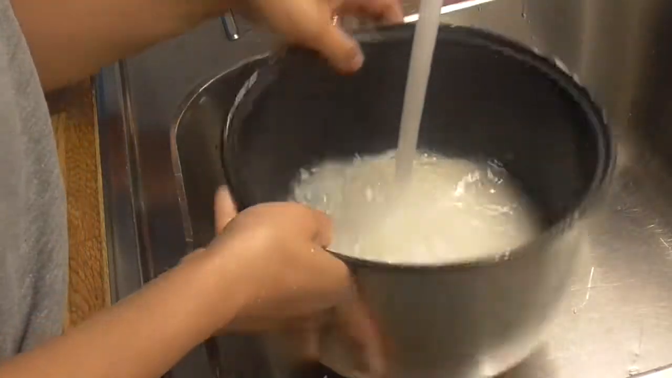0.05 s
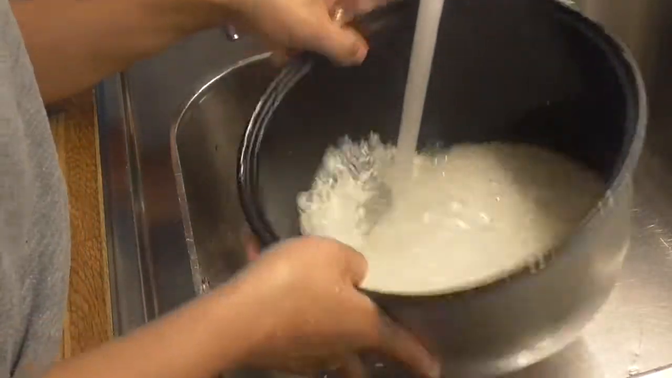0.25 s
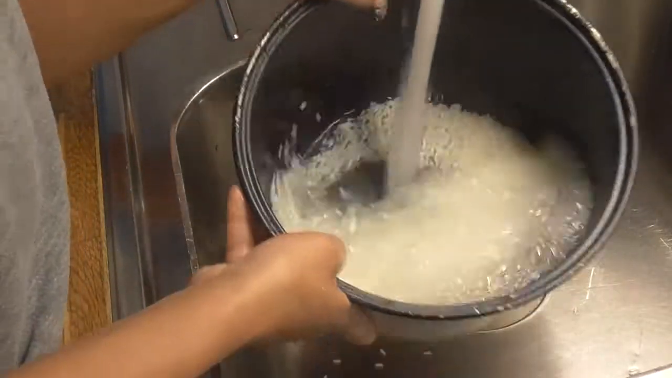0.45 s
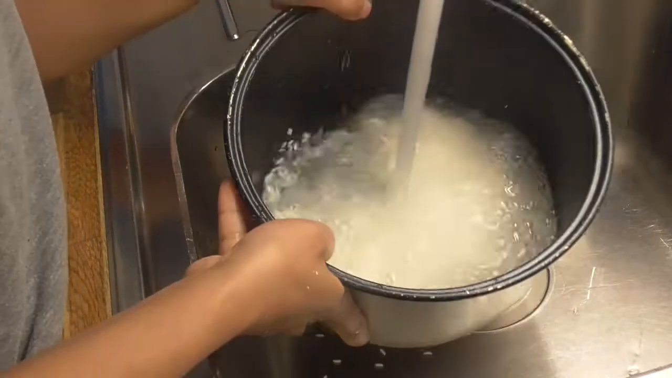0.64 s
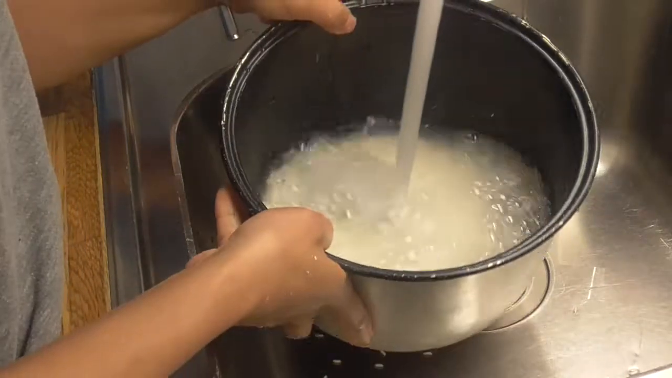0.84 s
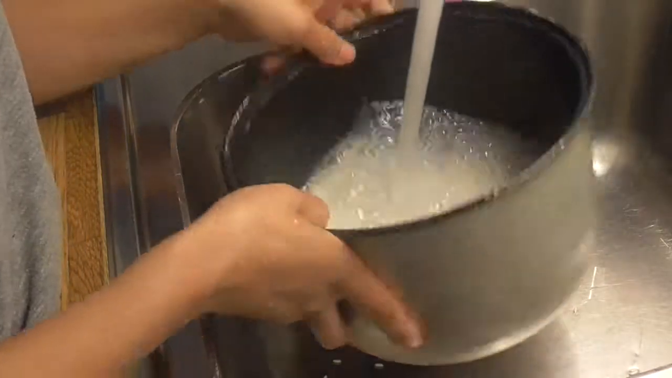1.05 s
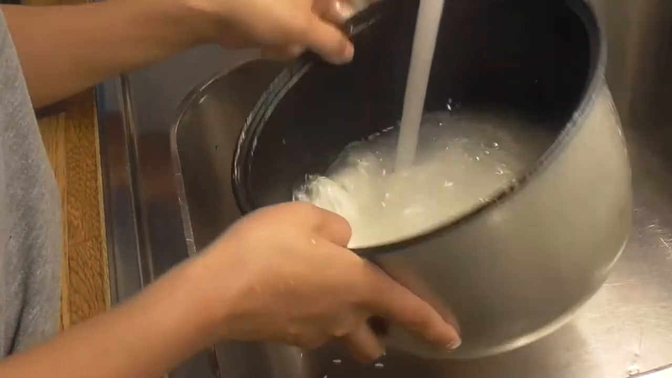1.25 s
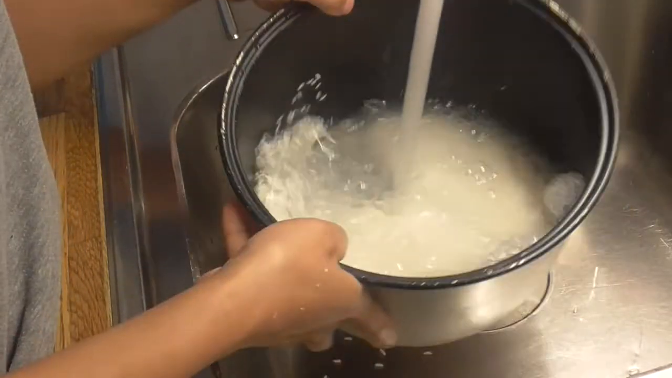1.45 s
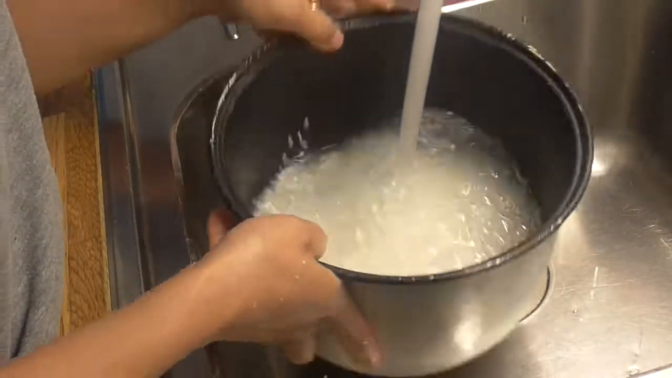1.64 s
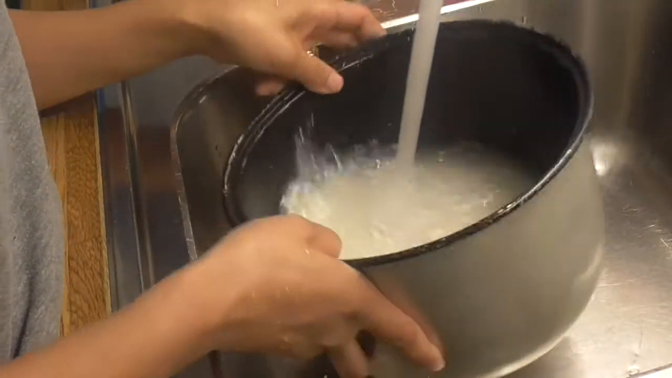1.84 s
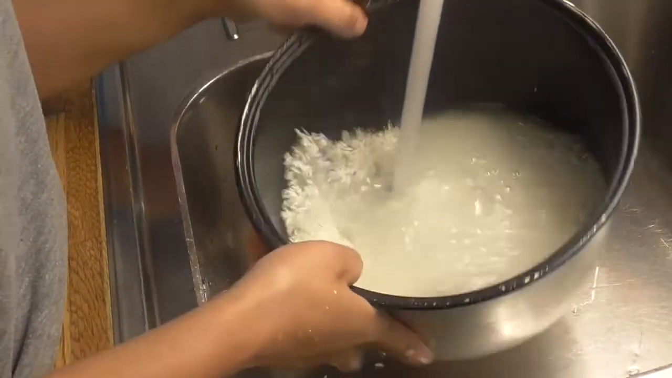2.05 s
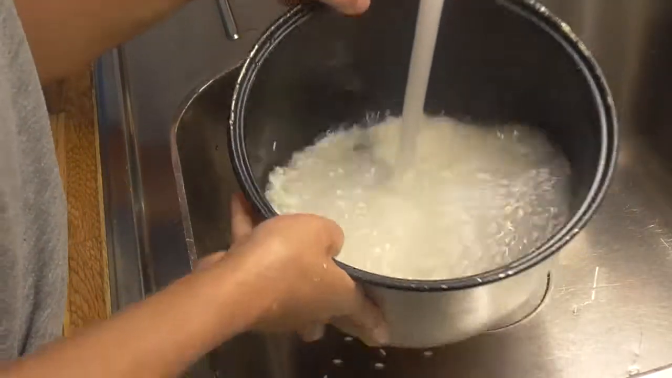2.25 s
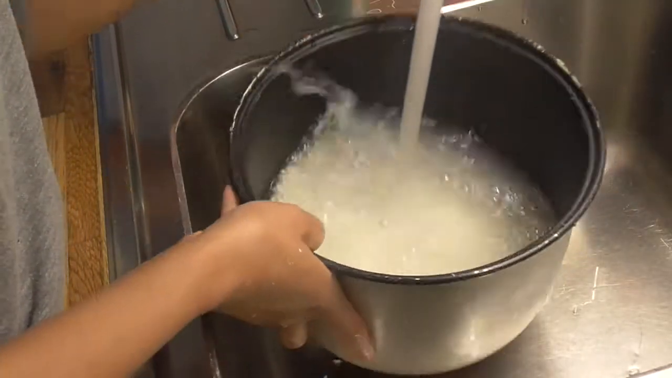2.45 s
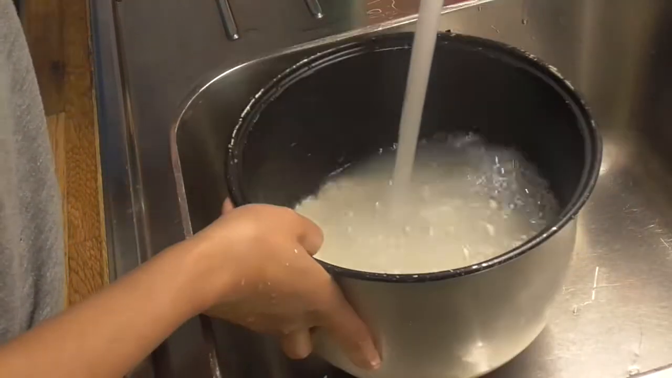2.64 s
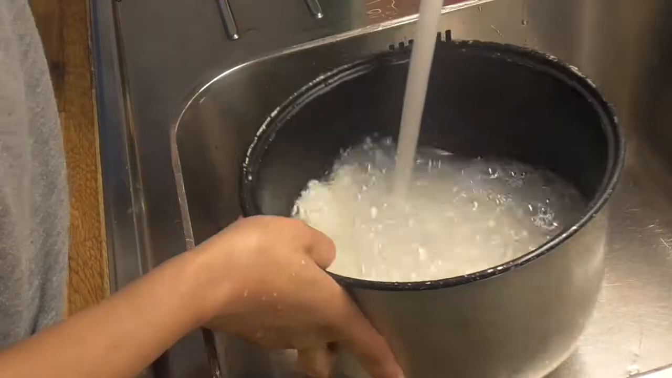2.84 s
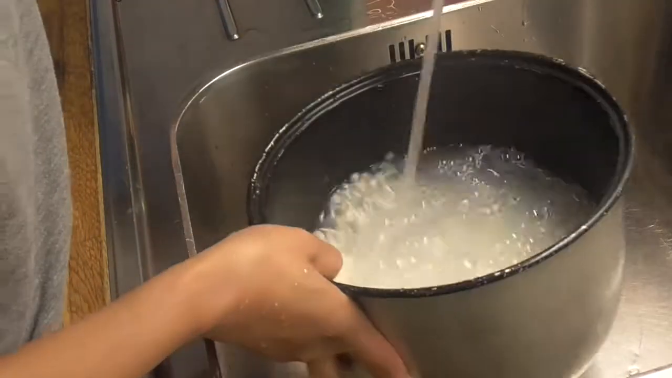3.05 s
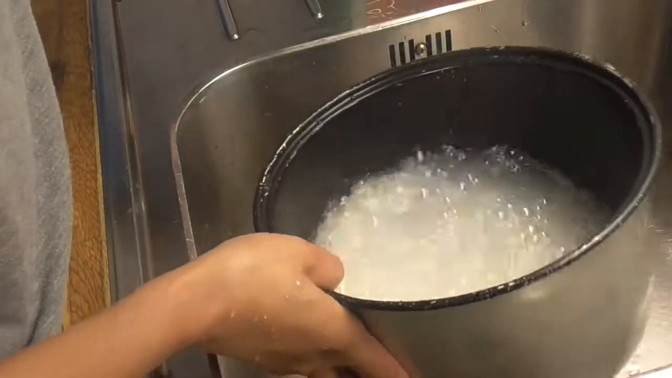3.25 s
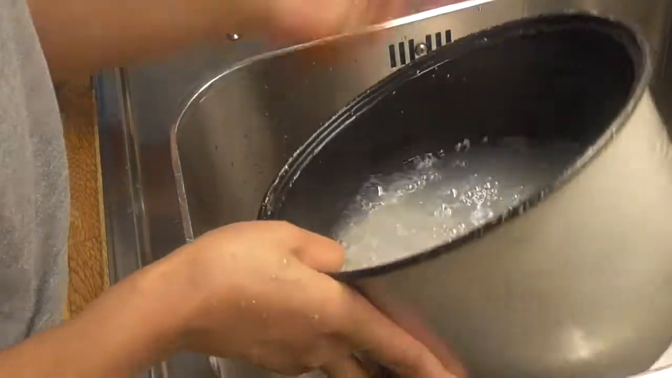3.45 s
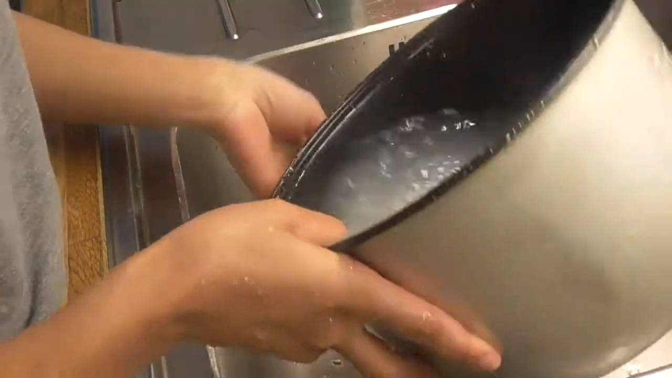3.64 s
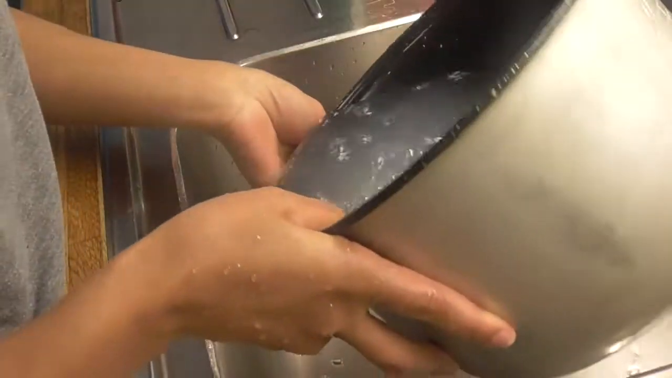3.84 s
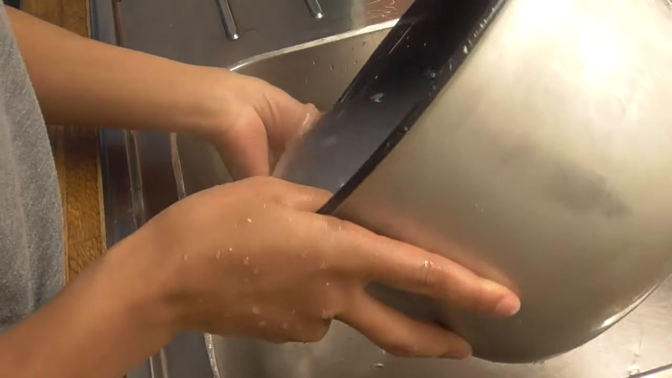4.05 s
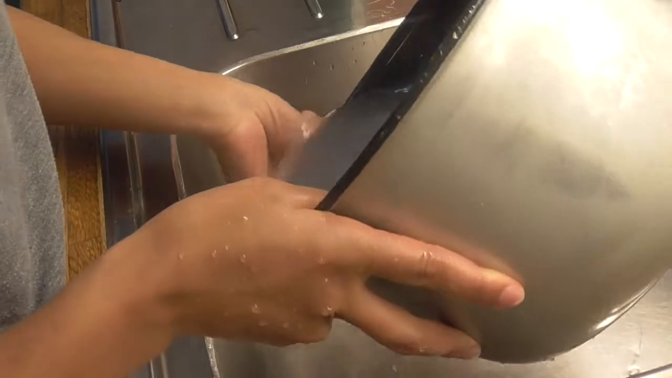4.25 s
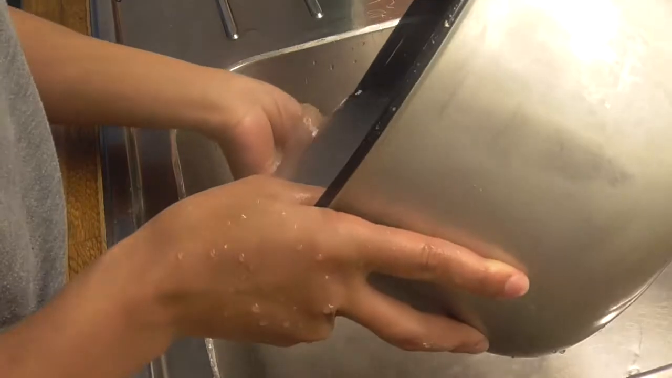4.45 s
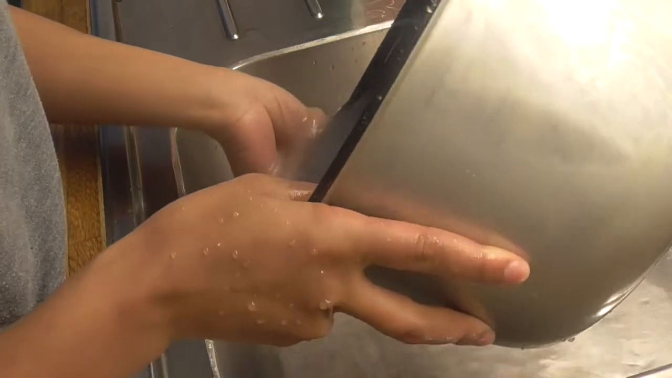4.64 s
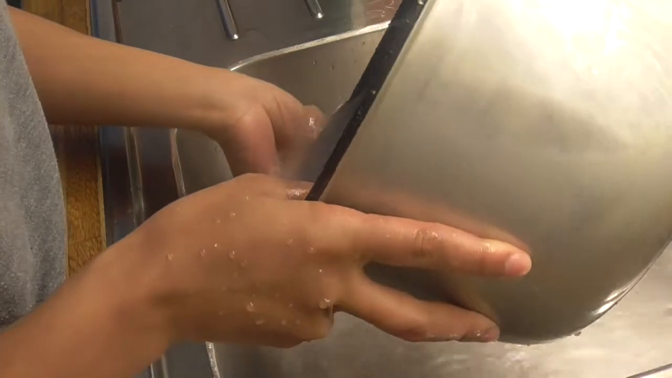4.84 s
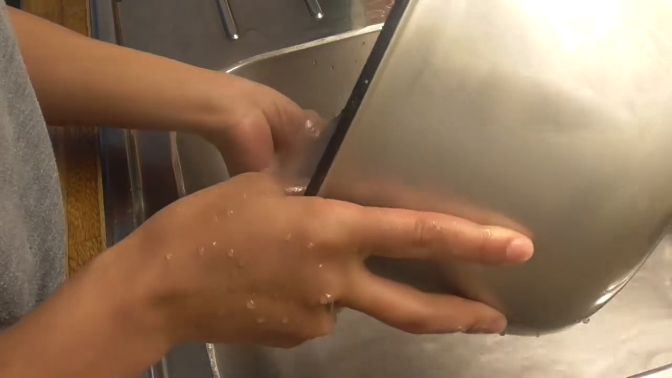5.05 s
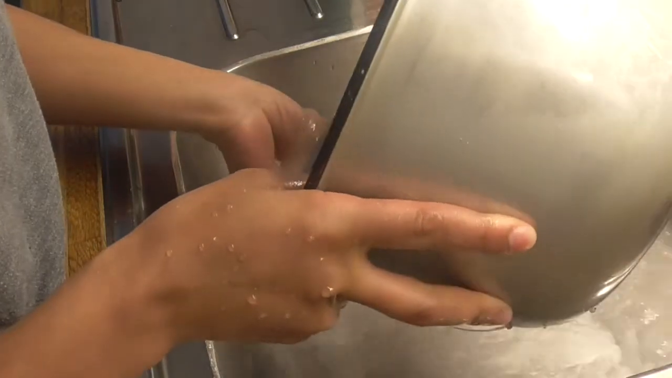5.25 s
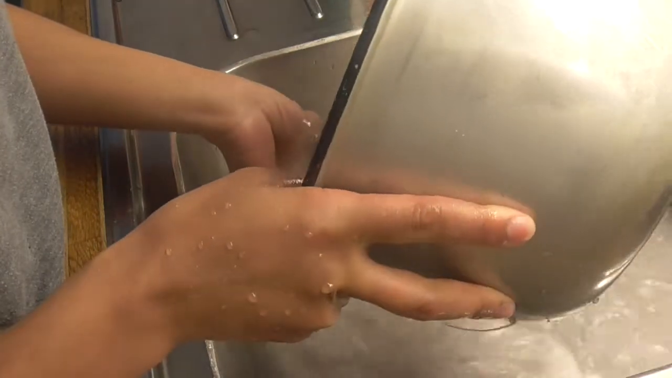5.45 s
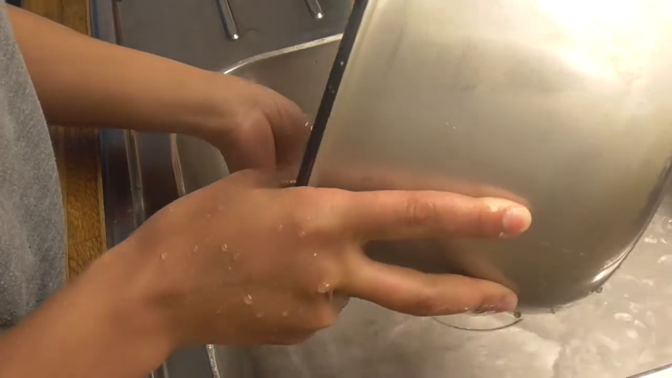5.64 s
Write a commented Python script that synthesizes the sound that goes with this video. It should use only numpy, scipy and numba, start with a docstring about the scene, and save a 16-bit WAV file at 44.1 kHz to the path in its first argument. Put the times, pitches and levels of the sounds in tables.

```python
"""Tap water runs into a metal pot of rice swirled over a steel sink: noise and clouds of decaying sines make
the jet's fizz and splash, and bubbles gurgle through the pot's air resonances. As the tap shuts, froth fizzes
and drops ping. The tilted pot knocks against the sink with ringing modes, soft thuds and scraping noise.
Then water spills over the rim, first in drops, then as a stream that patters in bubble clouds and drums on
the steel as resonated noise. A soft steady hiss lies under it all."""
import sys
import numpy as np
from scipy import signal
from scipy.fft import rfft, irfft
from scipy.io import wavfile
from numba import njit

SR = 44100
rng = np.random.default_rng(int(sys.argv[2]) if len(sys.argv) > 2 else 0)


def transcribe(signal):
    """Save signal, clipped to [-1, 1], as a 16-bit WAV file at the path in sys.argv[1]."""
    frames = np.atleast_2d(signal).T
    limited = np.clip(frames, -1, 1)
    pcm = np.round(limited * 32767).astype(np.int16)
    wavfile.write(sys.argv[1], SR, pcm)


N = 251370
TIME = np.arange(N) / SR  # t/s of every sample


# Colour of the jet's fine spray: f/Hz, level/dB (per Hz)
SPRAY_COLOUR = [(3820, -61), (6500, -11), (9370, -4), (11300, -4), (14900, -10.5), (15900, -19)]
# Colour of the jet's splashing: f/Hz, level/dB (per Hz)
SPLASH_COLOUR = [(600, -14), (900, 3), (1400, 2), (1770, -4), (2240, -5), (2650, -7), (3150, -3),
                 (3750, 0.5), (4600, -1.5), (5900, -2), (7000, -8), (9100, -28)]
# Colour of the air bubbles driven under the surface: f/Hz, level/dB (per Hz)
GURGLE_COLOUR = [(40, -47), (90, -11), (150, -18.5), (210, -9), (330, -7), (400, -2.5), (510, -2.5),
                 (690, -3.5), (780, -16), (900, -13), (1050, -11), (1450, -22.5), (1750, -38), (2600, -28)]
# Air resonances of the pot: f/Hz, width/Hz, level/dB
POT_AIR_MODES = [(259.3, 15.6, 12.5), (514.5, 27, 1.5), (571.8, 7.4, 5.5), (705, 23, 3), (869, 16, 8)]
POT_DRIFT = 0.025  # share by which moving water shifts the pot's resonances


def tap():
    """The jet sprays and splashes; the air it drags under gurgles in the hollow of the pot."""
    spray_gain, splash_gain, gurgle_gain = jet_gains()
    flutter = walk(70)  # the jet breaks up unevenly
    slosh = walk(21.9)  # the surface rocks
    spray = fizz(SPRAY_COLOUR, rate=7000, low_hz=6000, high_hz=16000, cycles=14, spread_db=2.6, hiss_db=2.5)
    splash = fizz(SPLASH_COLOUR, rate=4500, low_hz=800, high_hz=7500, cycles=22, spread_db=1.8, hiss_db=4)
    drift = POT_DRIFT * walk(11)
    gurgles = []
    for _ in range(2):
        cloud = bubbles(rate=1100, low_hz=150, high_hz=1900, cycles=32, spread_db=1.35, glide=0.1)
        churn = colour(cloud + 0.5 * rng.standard_normal(N), GURGLE_COLOUR)
        hollow = unit(churn + resonate(churn, POT_AIR_MODES))
        gurgles.append(waver(hollow, drift))
    hiss = spray_gain * spray + splash_gain * splash
    jet = hiss * undb(0.89 * flutter + 0.58 * slosh)
    return jet + gurgle_gain * stereo(*gurgles) * undb(0.34 * flutter + 0.18 * slosh)


# Waves of deeper water that each swirl sends under the jet: t/s of the crest, half length/s, rise/dB
SWIRL_WAVES = [(.29, 0.094, 6), (.73, 0.057, 5), (1.24, 0.19, 5.5), (1.46, 0.067, 7.5), (1.68, 0.061, 2),
               (1.89, 0.068, 3.5), (2.06, 0.22, 5.5), (2.47, 0.078, 6), (2.81, 0.22, 6), (3.14, 0.12, 7)]
# The rocking pot shields or bares the fine spray: t/s of the crest, half length/s, rise/dB
POT_TILTS = [(.85, 0.56, -1), (1.58, .14, 1), (2.25, 0.11, 1.3)]
SPRAY_DB, SPLASH_DB, GURGLE_DB = -25.5, -32, -33  # open tap, before flow, waves and flutter
SHUT_S, SHUT_EASE_S = 3.153, 0.074  # the tap is half shut
GURGLE_LAG_S, GURGLE_EASE_S = 0.15, 0.045  # air already dragged under gurgles on
SPLASH_POWER = 0.64  # power of the flow below 1, so the splashing outlasts the spray
WAVE_SPLASH = 0.021  # share of a wave's rise in dB that the splashing follows
BARE_S, THINNING_S, THINNING_DB = 0.436, 0.074, 5  # one swing bares the bottom of the pot
COVER_S, BARE_DIP_DB = 0.075, -9  # the hiss is lowest COVER_S after that, until the water is back
SLAP_DB, SLAP_T60_S = -21, 0.049  # burst of splashing as the bottom is bared


def jet_gains():
    """Spray, splashing and gurgling follow the tap's flow and the depth of the water under the jet."""
    flow = closing(SHUT_S, SHUT_EASE_S)
    waves_db = swells(SWIRL_WAVES)
    since = TIME - BARE_S
    thinning_db = THINNING_DB * np.exp(-np.abs(since) / THINNING_S) * (since < 0)
    covering = np.maximum(since, 0) / COVER_S
    dip_db = BARE_DIP_DB * covering * np.exp((1 - covering ** 2) / 2)
    depth_db = thinning_db + dip_db
    spray = flow * undb(SPRAY_DB + depth_db + swells(POT_TILTS))
    splash = flow ** SPLASH_POWER * undb(SPLASH_DB + depth_db + WAVE_SPLASH * waves_db)
    slap = undb(SLAP_DB) * fade(BARE_S, SLAP_T60_S)
    gurgle = closing(SHUT_S + GURGLE_LAG_S, GURGLE_EASE_S) * undb(GURGLE_DB + waves_db)
    return spray, splash + slap, gurgle


# Colour of the poured spray: f/Hz, level/dB (per Hz)
POUR_SPRAY_COLOUR = [(3530, -37), (6000, -13), (8050, -7.5), (8850, -7), (11900, -6), (13800, -10),
                     (15500, -26)]
# Colour of the patter on steel: f/Hz, level/dB (per Hz)
PATTER_COLOUR = [(600, -32), (1300, -0.5), (1800, -9), (2200, 5), (2700, -2), (4000, 4.5), (6000, -0.5),
                 (7500, -37), (10000, -62)]
# Colour of the puddle in the sink: f/Hz, level/dB (per Hz)
PUDDLE_COLOUR = [(250, -4.5), (500, -18), (650, 3), (820, -7.5), (1100, -3.5), (1450, -6.5), (1900, -5.5),
                 (2600, -31)]
# Water running over the rim as the pot is tipped: t/s, share of the full flow
POUR_FLOW_CURVE = [(4.14, 0.025), (4.21, 0.043), (4.29, 0.03), (4.39, 0.42), (4.455, 0.27), (4.52, 0.57),
                   (4.63, 0.61), (4.79, 0.89), (5.45, 0.98), (5.7, 0.81)]
# Growth of spray, patter, puddle and drumming, one row each: level/dB at full flow, power of the flow
POUR_GROWTH = [(-28.5, 0.52), (-33, 1.04), (-37.5, 2), (-37.5, 0.2)]
# Heavy gouts plunging into the puddle: t/s of the crest, half length/s, rise/dB
GOUT_PLUNGES = [(4.81, 0.025, 2), (4.94, 0.03, 8.5), (5.4, 0.046, 1)]
TINKLE_DB = 1.5  # ringing bubbles against the patter
DRIBBLE_DB = -11  # drumming of the dribble against that of the stream
DRUM_START_S, DRUM_EASE_S = 4.285, 0.012  # the dribble joins into a stream and starts to drum
CUSHION_S, CUSHION_EASE_S, CUSHION_DB = 5.5, 0.04, -2.5  # the deepening puddle softens the drumming


def pour():
    """The sheet of water tears into gouts that spatter, tinkle, gurgle in the puddle and shake the sink."""
    flow = np.interp(TIME, *np.transpose(POUR_FLOW_CURVE), left=0)
    spray_gain, patter_gain, puddle_gain, drum_gain = (undb(db) * flow ** power for db, power in POUR_GROWTH)
    gouts = undb(0.81 * walk(90) + 1.14 * walk(24))
    spray = fizz(POUR_SPRAY_COLOUR, rate=2200, low_hz=5500, high_hz=15000, cycles=28, spread_db=2.7, hiss_db=0)
    patter = fizz(PATTER_COLOUR, rate=3200, low_hz=1200, high_hz=7000, cycles=30, spread_db=2, hiss_db=3)
    # longer-lived bubbles ring here and there across the sink
    mid, side = (
        unit(colour(bubbles(rate=210, low_hz=1200, high_hz=7000, cycles=190, spread_db=1.6, glide=0.04),
                    PATTER_COLOUR))
        for _ in range(2))
    tinkle = (mid + side * np.array([[0.5], [-0.5]])) / 2
    puddle = fizz(PUDDLE_COLOUR, rate=520, low_hz=480, high_hz=2300, cycles=55, spread_db=1.5, hiss_db=-4)
    stream = 1 - (1 - undb(DRIBBLE_DB)) * closing(DRUM_START_S, DRUM_EASE_S)
    cushion = undb(CUSHION_DB * (1 - closing(CUSHION_S, CUSHION_EASE_S)))
    spatter = spray_gain * spray + patter_gain * (patter + undb(TINKLE_DB) * tinkle)
    plunging = puddle_gain * undb(swells(GOUT_PLUNGES)) * puddle
    return gouts * spatter + plunging + drum_gain * stream * cushion * drumming()


# Resonances of the sink's floor under the stream: f/Hz, width/Hz, level/dB
SINK_MODES = [(75, 25, -17), (117, 44, -3), (209, 7.3, 10.5), (239.7, 8.9, 11.5), (266, 9.6, 14.5),
              (345, 30, 5.5), (403, 26, 1.5), (660, 110, -4.5)]
# Modes that ring only while that floor is still bare: f/Hz, width/Hz, level/dB
BARE_SINK_MODES = [(232, 13, 1.5), (339, 19, -0.5), (392, 17, -9), (696, 42, -7.5)]
BARE_SINK_DB, SINK_COVERED_S, SINK_COVER_EASE_S = -2.5, 4.8, 0.03
DRUM_DRIFT = 0.035  # share by which moving water shifts the sink's resonances


def drumming():
    """Noise blows ring the sink's floor; water on it makes the pitch wander and damps the bare modes."""
    bare = closing(SINK_COVERED_S, SINK_COVER_EASE_S)
    drift = DRUM_DRIFT * walk(9)
    drums = []
    for _ in range(2):
        blows = colour(rng.standard_normal(N), [(30, -43), (80, 7.0), (650, 2.5), (1500, -21)])
        wet_floor = waver(unit(resonate(blows, SINK_MODES)), drift)
        bare_floor = unit(resonate(blows, BARE_SINK_MODES))
        drums.append(wet_floor + undb(BARE_SINK_DB) * bare * bare_floor)
    return stereo(*drums)


# Large single bubbles: t/s, level/dB, f/Hz
PLOP_BUBBLES = [(.285, -16, 460), (.319, -15, 458), (.343, -10.5, 528), (0.436, -11.5, 1164),
                (.653, -18, 506), (.693, -16, 516), (.725, -20, 946), (1.18, -21, 703), (1.209, -16, 670),
                (1.322, -11, 517), (1.407, -12, 272), (1.446, -12, 456), (1.482, -9.5, 408),
                (1.487, -16.5, 660), (1.494, -19.5, 960), (1.713, -12.5, 512), (1.785, -20, 920),
                (1.815, -13.5, 575), (1.869, -7, 535), (1.875, -10.5, 251), (1.929, -14.5, 487),
                (1.962, -14, 260), (1.972, -11, 498), (2.052, -14, 665), (2.055, -11, 413),
                (2.079, -14, 256), (2.122, -11.5, 510), (2.225, -15, 404), (2.392, -15.5, 1004),
                (2.408, -13.5, 562), (2.65, -16, 557), (2.714, -21, 554), (2.718, -20, 226),
                (2.776, -12, 594), (2.785, -11, 990), (2.816, -14.5, 946), (2.823, -14, 267),
                (3.033, -15, 690), (3.166, -8.5, 474), (3.172, -11, 257), (3.262, -22.5, 1040),
                (3.33, -22.5, 967), (3.332, -25, 1295), (3.355, -30, 900), (4.342, -29, 3780),
                (4.601, -23, 4150), (4.66, -28, 1940), (4.746, -26, 2000), (4.806, -21, 1350),
                (4.915, -17.5, 1090), (4.925, -24, 645), (4.944, -17, 1106), (4.986, -21.5, 1070),
                (5.045, -23, 1300), (5.183, -25, 2800), (5.369, -20.5, 605), (5.371, -23, 403)]
PLOP_CYCLES, PLOP_CYCLES_POWER = 54, 0.84  # cycles of ringing at 1 kHz; smaller bubbles ring for more cycles
PLOP_GLIDE = 0.1  # spread of the share by which the pitch bends up or down


def plops():
    """Large pockets of air ring as they close, each bending in pitch by a small random share, up or down."""
    starts, db, hz = np.array(PLOP_BUBBLES, float).T.copy()
    cycles = PLOP_CYCLES * (hz / 1000) ** PLOP_CYCLES_POWER
    glide = PLOP_GLIDE * rng.standard_normal(len(starts))
    rings = ring(starts, hz, cycles, undb(db), glide)
    return colour(rings, [(70, -19.5), (220, -2)])  # small sources radiate little bass


# Colour of the jet drumming on the bare bottom of the pot: f/Hz, level/dB (per Hz)
POT_BOTTOM_COLOUR = [(20, -28), (45, -8), (125, -2), (280, -2.5), (450, -7.5), (1300, -9.5), (2500, -26)]
# Dull thuds of the handled pot: t/s, level/dB, t60/s
DULL_THUMPS = [(.438, -28, 0.077), (0.481, -30, 0.18), (3.126, -34, 0.26), (4.925, -38, .1)]
BOTTOM_DB, BOTTOM_T60_S = -28.5, 0.65


def bottom():
    """With the rice swept aside, the jet drums on the bare bottom; the handled pot thuds in the same dull noise."""
    bared = undb(BOTTOM_DB) * fade(BARE_S, BOTTOM_T60_S)
    thumps = sum(undb(db) * fade(start, t60) for start, db, t60 in DULL_THUMPS)
    return (bared + thumps) * coloured_noise(POT_BOTTOM_COLOUR)


# Modes of pot and sink ringing together: f/Hz, level/dB, t60/s
METAL_MODES = [(109.3, -27, 0.26), (166, -28, 0.25), (182, -19, 0.11), (239.2, -11.5, 0.32),
               (267.6, -9.5, 0.3), (296, -16, 0.15), (410, -13, 0.23), (448, -23, 0.39), (566, -32, 0.41),
               (605, -27, 0.55), (630, -24, 0.12), (727, -10, 0.37), (791, -39.5, 2.17), (864, -35, 0.36),
               (900, -41, 0.55), (974, -43.5, 1.4), (1077, -21.5, 0.16), (1240, -29, 0.28),
               (1370, -37, 0.33), (1510, -48, 0.51), (1880, -52, 0.24), (1981, -46, 0.35)]
# Colour of the contact itself: f/Hz, level/dB (per Hz)
CRACK_COLOUR = [(30, -47), (100, -2), (260, 2), (400, -2), (1100, -20), (2000, -29.5), (4000, -34),
                (8000, -48), (15000, -53)]
# The pot's two contacts with the sink, scraping as it settles: t/s, thud level/dB, scrape level/dB, scrape t60/s
POT_CONTACTS = [(3.653, -8.5, -19, 0.08), (3.665, -15, -28, 0.25)]
KNOCK_S, THUD_S = 3.653, 0.00098  # start of the ringing; softness of a contact
TOUCH_LEAD_S, TOUCH_DB, TOUCH_T60_S = 0.0026, -22, 0.036  # the pot grazes the steel before its weight lands


def knock():
    """The heavy pot bumps the sink: contacts thud and scrape, and decaying sines ring and beat."""
    age = np.maximum(TIME - KNOCK_S, 0)
    modes = 0
    for k, (hz, db, t60) in enumerate(METAL_MODES):
        decay = np.exp(-np.log(1000) * age / t60)
        # neighbouring modes start in opposite directions
        modes = modes + (-1) ** k * undb(db) * np.sin(2 * np.pi * hz * age) * decay
    push = 1 - np.exp(-age / 0.0017)  # soft onset
    crack = coloured_noise(CRACK_COLOUR)
    thuds, scrape = 0, undb(TOUCH_DB) * fade(KNOCK_S - TOUCH_LEAD_S, TOUCH_T60_S)
    for start, thud_db, scrape_db, t60 in POT_CONTACTS:
        flex = (TIME - start) / THUD_S - 2  # the sink's floor gives way and springs back
        thuds = thuds + undb(thud_db) * flex * np.exp((1 - flex ** 2) / 2)
        scrape = scrape + undb(scrape_db) * fade(start, t60)
    thuds = colour(thuds, [(45, -26), (80, -12), (160, -2), (250, 0)])
    return push * modes + thuds + scrape * crack


def room(x, t60, wet_db):
    """Short echo of the hard kitchen walls, from decaying noise that differs in each ear."""
    tails = rng.standard_normal((2, SR // 2)) * fade(0.0036, t60)[:SR // 2]
    tails /= np.sqrt(np.sum(tails ** 2, axis=1, keepdims=True))
    return x + undb(wet_db) * signal.oaconvolve(x, tails, axes=1)[:, :N]


# Single drops: t/s, ping level/dB, ping f/Hz, splash level/dB, splash t60/s
SINGLE_DROPS = [(3.242, -8, 11200, -33, .02), (3.248, -10.5, 7450, -26.5, 0.036),
                (3.264, -13, 11500, -22, 0.014), (3.271, -22, 4700, -35, 0.027),
                (3.291, -31, 4260, -29, 0.027), (3.322, -11, 12200, -20.5, 0.013),
                (3.527, -23, 8200, -46, 0.08), (3.632, -18.5, 10860, -48, .025),
                (4.12, -26, 7050, -28.5, 0.07), (4.124, -26, 5200, -33, .06), (4.133, -6, 12100, -42, 0.12),
                (4.161, -32, 8060, -39.5, 0.16), (4.232, -24, 4900, -29.5, 0.077),
                (4.2374, 6, 11500, -43, .05), (4.304, -12, 10000, -34.5, 0.49),
                (4.357, -9, 11400, -32, 0.033), (4.408, -17, 11000, -26, 0.039),
                (4.49, -27, 3930, -44, .08), (4.889, -17, 3970, -21, 0.07), (4.987, -11, 2960, -25, 0.23),
                (5.108, -11.5, 3400, -34, .046), (5.146, -12.5, 4970, -37, .16)]
# Colour of a drop's splash: f/Hz, level/dB (per Hz)
SPLAT_COLOUR = [(700, -1), (2000, -6.5), (4000, 4.5), (6500, 5.5), (11000, 10.5), (14000, 7.5),
                (16000, -56)]


def drops():
    """Each drop pings as a short bubble sine and scatters into a dying splash."""
    starts, ping_db, hz, splash_db, t60 = np.array(SINGLE_DROPS, float).T.copy()
    pings = ring(starts, hz, np.full(len(starts), 22.0), undb(ping_db), np.full(len(starts), 0.028))
    scatter = sum(undb(db) * fade(start, length) for start, db, length in zip(starts, splash_db, t60))
    splats = fizz(SPLAT_COLOUR, rate=2800, low_hz=2040, high_hz=16800, cycles=1.9, spread_db=5.5, hiss_db=5)
    return pings + scatter * splats


# Droplets flung by the swirl, the tap's last spurts and the pour: t/s, level/dB, t60/s
DROPLET_BURSTS = [(.333, -30, 0.19), (.368, -27.5, .16), (.437, -23, 0.069), (1.5, -33, 0.44),
                  (1.787, -30, 0.13), (2.16, -32, 0.43), (3.248, -27.5, 0.055), (3.292, -29.5, 0.06),
                  (3.323, -29, 0.024), (4.389, -31.5, 0.094), (4.49, -32, .1), (4.757, -27.5, 0.13),
                  (5.226, -38, 0.061), (5.259, -37, .06), (5.295, -32, .06), (5.481, -39, 0.064)]
# Colour of those droplets: f/Hz, level/dB (per Hz)
CRACKLE_COLOUR = [(1200, -16), (2300, -0.5), (2900, -11), (3900, 2.5), (4800, -1), (6500, -11), (8500, -45)]


def spatters():
    """Handfuls of droplets crackle against the metal in dying bursts of short rings."""
    bursts = sum(undb(db) * fade(start, t60) for start, db, t60 in DROPLET_BURSTS)
    crackle = fizz(CRACKLE_COLOUR, rate=1100, low_hz=1700, high_hz=7000, cycles=34, spread_db=2.2, hiss_db=-7)
    return bursts * crackle


# Colour of the froth left by the jet: f/Hz, level/dB (per Hz)
FOAM_COLOUR = [(2500, -18), (4000, -2), (9000, 2), (13000, 1), (15500, -14)]
FOAM_DB, FOAM_T60_S = -51.5, 5.7


def foam():
    """From the moment the tap is half shut, the froth on the rice water fizzes out in tiny bursting bubbles."""
    froth = fizz(FOAM_COLOUR, rate=900, low_hz=3500, high_hz=14000, cycles=24, spread_db=2.6, hiss_db=0)
    return undb(FOAM_DB) * fade(SHUT_S, FOAM_T60_S) * froth


# Colour of the quiet kitchen: f/Hz, level/dB (per Hz)
KITCHEN_COLOUR = [(18, -54), (30, -30), (93, 10), (149, 7), (372, 6), (983, -3.5), (1120, 0), (1420, -14),
                  (1750, -12), (2700, -18), (3560, -11.5), (9150, -8), (12900, -7.5), (14300, -19),
                  (15900, -19)]


def kitchen():
    """A soft steady background hiss of coloured noise, wider than the water."""
    return undb(-54.5) * coloured_noise(KITCHEN_COLOUR, side_db=5.0)


def fizz(points, rate, low_hz, high_hz, cycles, spread_db, hiss_db):
    """Small bursting bubbles over the hiss of those too fine to tell apart."""
    layers = []
    for _ in range(2):
        cloud = bubbles(rate, low_hz, high_hz, cycles, spread_db, 0.12)
        cloud = cloud + undb(hiss_db) * rng.standard_normal(N)
        layers.append(unit(colour(steel(cloud), points)))
    return stereo(*layers)


def bubbles(rate, low_hz, high_hz, cycles, spread_db, glide):
    """A cloud of bubbles (rate per second) of random time, pitch and size, with even power per Hz."""
    when, pitch, size, life, sign = rng.random((int(rate * N / SR), 5)).T
    hz = low_hz * (high_hz / low_hz) ** pitch
    sizes = hz * undb(-spread_db * np.log(size + 0.004)) * np.sign(sign - 0.5)
    return unit(ring(when * N / SR, hz, cycles * (0.5 + life), sizes, np.full(len(hz), glide)))


@njit
def ring(starts, hz, cycles, sizes, glide):
    """Bubbles: sines that swell for about a cycle, fall 60 dB in so many cycles and bend by the share glide."""
    out = np.zeros(N)
    for k in range(len(starts)):
        first, length = int(starts[k] * SR), int(cycles[k] * SR / hz[k]) + 2
        turn = 2 * np.pi * hz[k] / SR  # radians per sample
        pole = np.exp(1j * turn - 6.9 / length)
        bend = np.exp(1j * turn * glide[k] / length)
        z, onset, shrink = sizes[k] + 0j, 1., np.exp(-turn / 7)
        for i in range(max(first, 0), min(first + length, N)):
            out[i] += z.imag * (1 - onset)
            z, pole, onset = z * pole, pole * bend, onset * shrink
    return out


def steel(x):
    """Quick reflections between close metal walls smear each click a little."""
    tail = rng.standard_normal(2048) * fade(0.0003, 0.02)[:2048]
    tail = tail / np.linalg.norm(tail)
    # their strength wanders at random, so no fixed comb colours the sound
    return x + undb(-11) * signal.oaconvolve(x * walk(150), tail)[:N]


# Width of the sound: f/Hz, side minus mid level/dB
STEREO_WIDTH = [(60, -22), (300, -17), (600, -15), (1100, -8), (1900, -16), (2800, -28), (4200, -20),
                (6000, -5.5), (9500, -3.5), (13000, -5)]


def stereo(mid, side):
    """Mid plus a coloured side signal: nearly mono around 2800 Hz, widest in the treble."""
    return mid + colour(side, STEREO_WIDTH) * np.array([[1], [-1]])


def coloured_noise(points, side_db=0):
    """Steady stereo noise of a given colour, with independent mid and side."""
    mid, side = (unit(colour(rng.standard_normal(N), points)) for _ in range(2))
    return stereo(mid, undb(side_db) * side)


def colour(x, points):
    """Causal filter through (f/Hz, level/dB) points, from the cepstrum of its log gain."""
    size = 4096
    hz, db = np.transpose(points)
    bins_hz = np.fft.rfftfreq(size, 1 / SR) + 1  # offset keeps the logarithm finite
    log_gain = np.log(undb(np.interp(np.log(bins_hz), np.log(hz), db)))
    cepstrum = irfft(log_gain)[:size // 2]
    cepstrum[1:] *= 2  # folding gives minimum phase
    response = irfft(np.exp(rfft(cepstrum, size)))[:size // 2]
    return signal.oaconvolve(x, response)[:N]


def resonate(x, modes):
    """Sum of band-passes (f/Hz, width/Hz, level/dB)."""
    return sum(undb(db) * signal.lfilter(*signal.iirpeak(hz, hz / width, fs=SR), x) for hz, width, db in modes)


def waver(x, drift):
    """Shift the pitch of a steady sound by the moving share drift."""
    return np.interp(np.cumsum(1 + drift) % (N - 1), np.arange(N), x)


def walk(rate):
    """Random wander along straight lines between rate knots per second, spread near 1."""
    knots = rng.standard_normal(int(N / SR * rate) + 2)
    return 1.2 * np.interp(TIME * rate, np.arange(len(knots)), knots)


def swells(table):
    """Rise in dB from smooth humps (t/s, half length/s, rise/dB)."""
    return sum(db * np.exp(-((TIME - crest) / half) ** 2) for crest, half, db in table)


def closing(middle, ease):
    """Gain that eases from 1 to 0, half way at middle."""
    return (1 - np.tanh((TIME - middle) / (2 * ease))) / 2


def fade(start, t60):
    """Envelope that jumps up at start and falls 60 dB in t60 seconds."""
    return (TIME >= start) * np.exp(-np.log(1000) * np.abs(TIME - start) / t60)


def undb(db):
    """Decibels to gain."""
    return 10 ** (np.asarray(db) / 20)


def unit(x):
    """Scale to rms 1."""
    return x / np.sqrt(np.mean(x ** 2))


def scene():
    """Rinsing, the knock, then pouring off, over the kitchen's hiss."""
    water = tap() + bottom() + plops() + drops() + spatters() + foam() + pour()
    return water + room(knock(), t60=0.32, wet_db=-10.5) + kitchen()


# Balance of the two microphones: f/Hz, left minus right level/dB
MICROPHONE_BALANCE = [(100, -6), (260, -4), (550, -0.5), (1100, -0.5), (2200, -1), (6000, -1), (9500, -2),
                      (13000, 1.5)]
TOP_HZ = 15900  # upper band limit


def record(dry, low_cut_hz=52):
    """The right microphone gets more of the bass; the loudest peaks clip, then deep bass and top are cut."""
    heard = []
    for channel, side in zip(dry, (1, -1)):
        heard.append(colour(channel, [(hz, side * db / 2) for hz, db in MICROPHONE_BALANCE]))
    clipped = np.clip(np.array(heard), -0.9, 0.9)
    low_cut = signal.butter(3, low_cut_hz, "high", fs=SR, output="sos")
    top_cut = signal.ellip(10, 0.2, 80, TOP_HZ, fs=SR, output="sos")
    return signal.sosfilt(top_cut, signal.sosfilt(low_cut, clipped))


dry = scene()
out = record(dry)
transcribe(out)
```